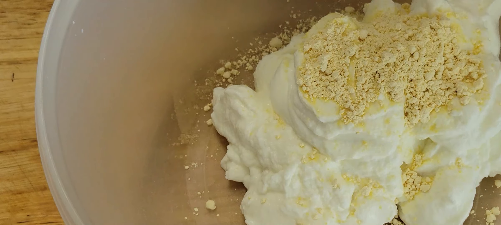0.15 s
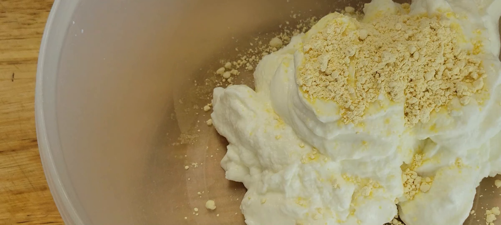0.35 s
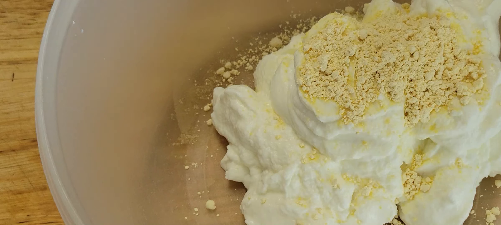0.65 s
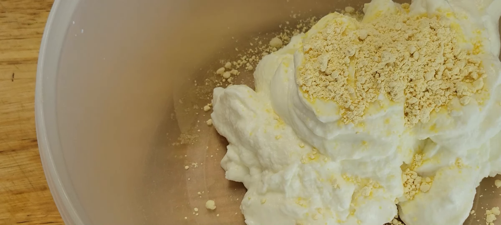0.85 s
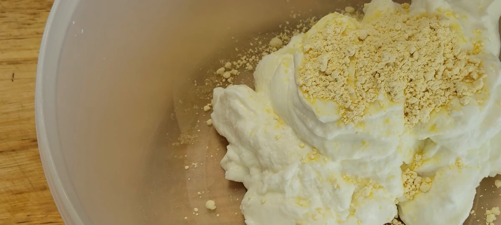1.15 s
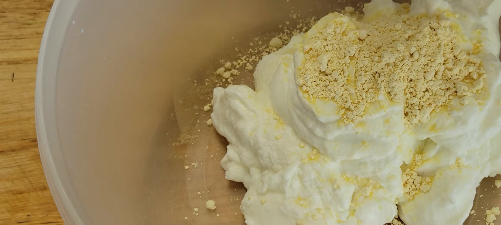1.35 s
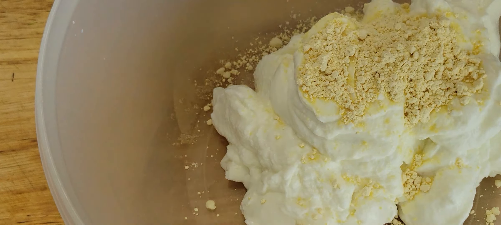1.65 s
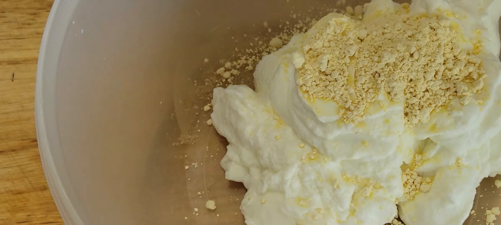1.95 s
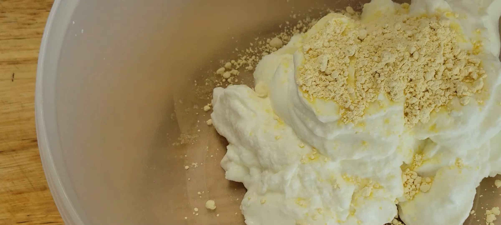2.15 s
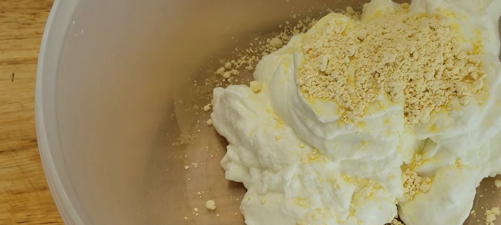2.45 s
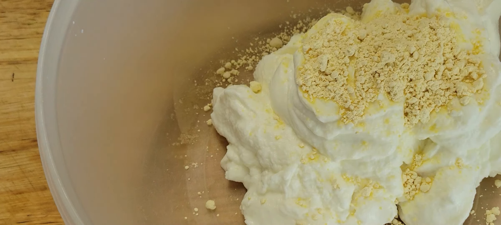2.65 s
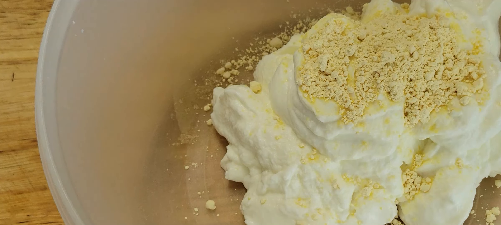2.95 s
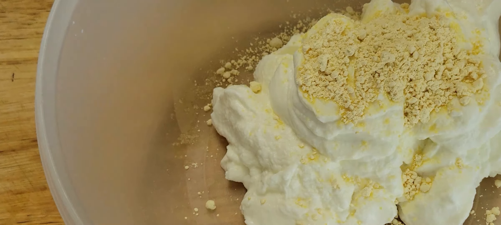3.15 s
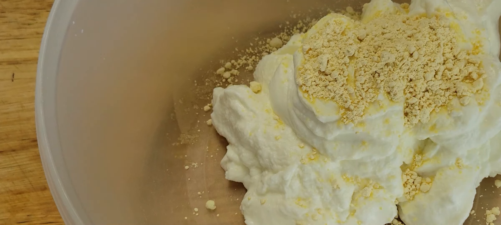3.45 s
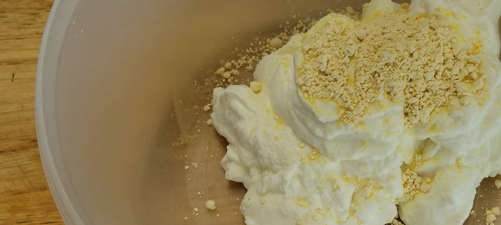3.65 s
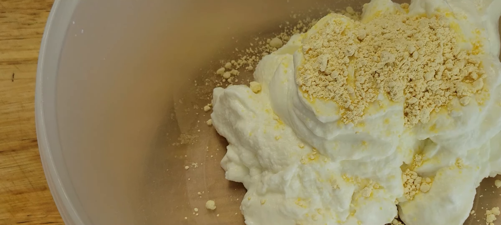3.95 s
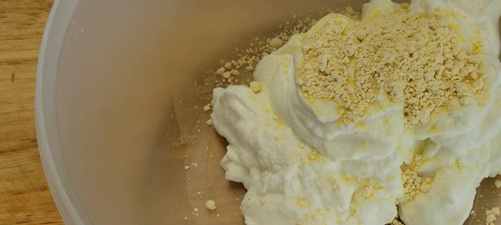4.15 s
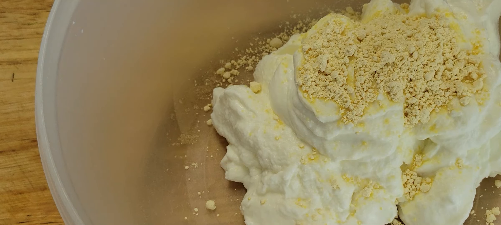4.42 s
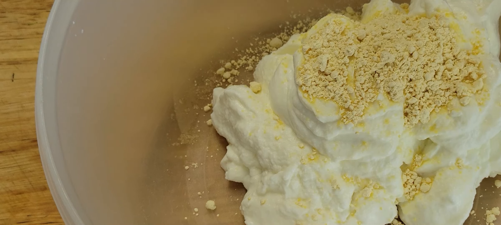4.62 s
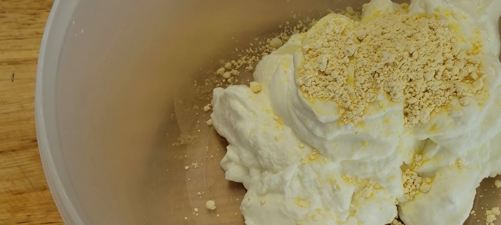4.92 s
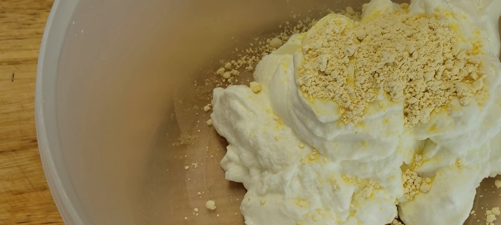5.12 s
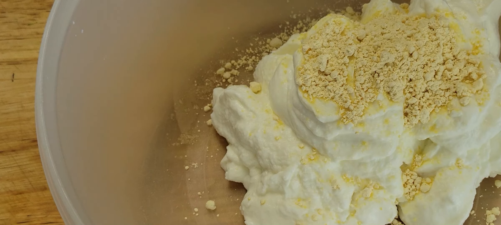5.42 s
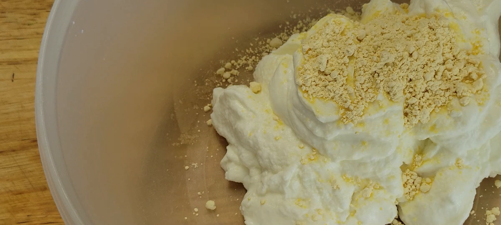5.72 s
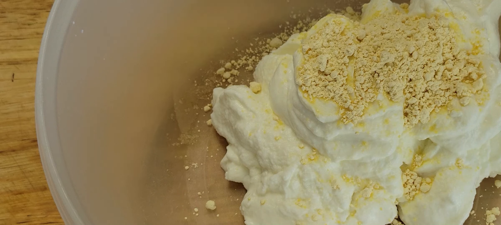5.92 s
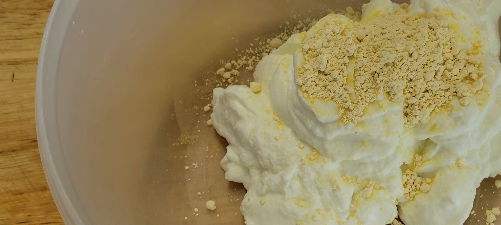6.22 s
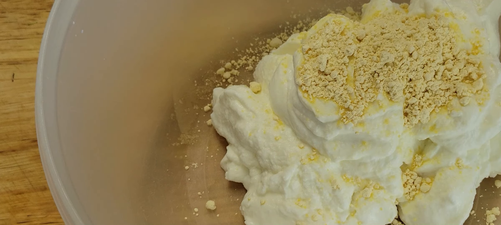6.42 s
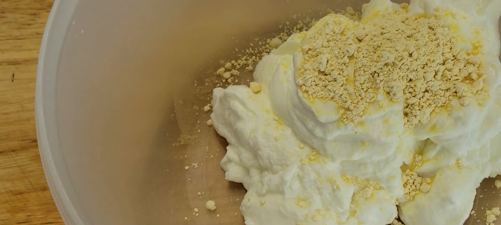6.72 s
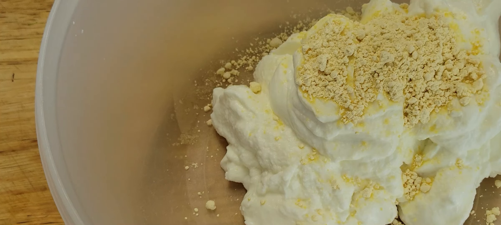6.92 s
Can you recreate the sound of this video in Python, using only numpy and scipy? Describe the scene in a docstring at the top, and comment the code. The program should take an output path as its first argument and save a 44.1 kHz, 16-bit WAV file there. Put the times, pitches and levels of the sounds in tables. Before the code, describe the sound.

In a quiet kitchen a steel tool clinks and rattles on a wooden counter, then a plastic bowl is knocked, dragged and thudded down.

```python
"""A quiet kitchen, small and hard-walled: coloured noise for air, sines for an appliance hum and a wavering drone.
Hands to the right make small ticks (short damped modes) and rustles (grainy noise).
A steel tool clinks and rattles on the counter: high modes, board modes and noise cracks.
A plastic bowl is knocked, dragged and set down: damped modes for the blows, grit through them for the slides.
Two spaced microphones hear it, with a decaying noise tail as the room."""
import sys
import numpy as np
from scipy import signal
from scipy.fft import rfft, irfft, next_fast_len
from scipy.io import wavfile
from scipy.ndimage import map_coordinates

SR = 44100
rng = np.random.default_rng(int(sys.argv[2]) if len(sys.argv) > 2 else 0)


def unload_audio(sound):
    """Save the sound as a 16-bit wav file, at the path given as the first command line argument."""
    columns = np.transpose(np.atleast_2d(sound))
    # keep every value between -1 and 1, then stretch to whole-number steps
    steps = np.round(np.clip(columns, -1, 1) * 32767)
    wavfile.write(sys.argv[1], SR, steps.astype(np.int16))


N = 312228  # samples in the scene

# Low drone, mean level over time: start_s [s], level_db [dB]
DRONE_LEVEL = [(0, -66), (.7, -67.5), (1.2, -73.5), (2, -66), (2.6, -61), (3, -59), (3.35, -62), (3.7, -56),
               (4.2, -53.5), (4.9, -56), (5.6, -74), (6.1, -62), (6.8, -56.5), (7.08, -63)]
DRONE_HZ = 95.5  # mean pitch
# Appliance hum tones, mean level: pitch_hz [Hz], level_db [dB]
HUM_TONES = [(118.4, -71.5), (240.5, -89), (359.7, -70.5), (420, -79), (467, -85), (719, -88)]
# Room tone colour, relative: pitch_hz [Hz], density_db [dB per Hz]
AIR_COLOUR = [(15, -42.5), (30, -18.5), (55, 1.5), (100, -4), (150, -8.5), (300, -15), (400, -4.5),
              (550, -12), (1200, -21.5), (2500, -29), (6000, -37.5), (16000, -47)]
AIR_DB = -69.5  # room tone level
# Left-right correlation of the room tone: pitch_hz [Hz], likeness [-1 to 1]
AIR_LIKENESS = [(60, 0.58), (130, 0.54), (290, 0.22), (640, -0.71), (1410, -0.38), (3100, -0.41),
                (6820, 0.18), (15000, -0.97)]
# Decay of the room: pitch_hz [Hz], t60_s [s]
ROOM_DECAY = [(100, 0.12), (600, 0.31), (3000, 0.26), (12000, 0.18)]

# Dry ticks: start_s [s], level_db [dB, relative], favoured pitch_hz [Hz]
TICKS = [(.017, -58.5, 1780), (1.959, -39.5, 2300), (1.974, -52, 4500), (1.983, -34, 1940),
         (1.9925, -28, 4030), (2.007, -47, 3050), (2.016, -63, 1790), (2.026, -47.5, 4000),
         (2.068, -54, 4000), (3.5, -53.5, 3500), (5.89, -48, 4640), (6.042, -55, 4500),
         (6.366, -42.5, 2800), (6.374, -39.5, 2820), (6.394, -38, 4500), (6.407, -37, 2780),
         (6.42, -43, 3500), (6.488, -40, 2900), (6.509, -41, 5600), (6.55, -39.5, 5600),
         (6.581, -33.5, 2090), (6.6, -57, 4460)]
# Modes of the small hard thing that ticks: pitch_hz [Hz], level_db [dB, relative], t60_s [s]
SMALL_MODES = [(1010, 0.5, 0.022), (1840, 9.5, 0.014), (2736, 10.5, 0.0081), (3560, 2.5, 0.0085),
               (4600, 6.5, 0.0085), (5700, 4, 0.005), (6500, 7.5, 0.01)]
# Brushes of hands and cloth, the fade spanning 30 dB on either side:
# start_s [s], hold_s [s], level_db [dB], fade_s [s], colour_hz [Hz]
BRUSHES = [(.02, .002, -60.5, 0.015, 2350), (0.337, 0.04, -80, .1, 1600), (0.443, .005, -72, .08, 1460),
           (0.76, .02, -85, .1, 2110), (0.89, 0.0046, -70.5, 0.16, 1550),
           (1.446, 0.024, -74.5, 0.032, 2500), (1.507, 0.015, -73, 0.099, 4600),
           (1.87, 0.04, -69, 0.049, 1270), (1.958, 0.0068, -57, 0.018, 2500),
           (1.983, 0.037, -67, 0.066, 3620), (2.403, .02, -94, 0.17, 1400),
           (2.697, 0.0091, -80, 0.11, 2900), (2.914, .005, -73.5, 0.13, 1600),
           (3.27, .02, -76.5, 0.085, 1600), (3.506, 0.0069, -59.5, 0.024, 3000),
           (3.53, 0.024, -78, 0.087, 3300), (3.693, 0.3, -79, 0.083, 1500), (4.12, 0.026, -81, .15, 2830),
           (5.9, .03, -77, 0.086, 4000), (6.099, 0.15, -72.5, .2, 6030)]

# Mode pitches of the steel tool: pitch_hz [Hz]
STEEL_HZ = [2474, 3149, 3219, 4175, 6094, 6224, 7448, 7720, 9637, 10515, 10992, 11170, 12340, 13332, 13432,
            15150]
# The same modes: t60_s [s], level_db struck at spots 1, 2 and 3 [dB], bounce_db [dB, relative]
STEEL_RING = [(0.25, -24.5, -39, -43.5, -35), (0.91, -53, -45, -37.5, -26.5), (0.58, -55, -44, -34, -26),
              (0.6, -38, -27.5, -27.5, -38), (1, -54.5, -43, -38, -55), (0.95, -32, -24, -18, -32.5),
              (0.91, -48, -37, -44, -42), (0.45, -43.5, -33.5, -22.5, -28), (0.35, -61.5, -52, -34, -51.5),
              (0.32, -62.5, -56, -46.5, -50), (0.11, -35.5, -21.5, -42, -35), (0.39, -49, -37, -51, -56),
              (0.37, -70, -47, -49, -56.5), (0.45, -60, -47.5, -43, -54.5),
              (0.38, -58, -48.5, -48.5, -54.5), (.1, -74, -77.5, -50.5, -71.5)]
# Ringing contacts of the tool: start_s [s], crack_db [dB]
CLINKS = [(4.3827, -27), (4.4189, -19), (4.5479, -20)]
# Landings of the tool on the counter: start_s [s], level_db [dB, reference for ring and tap]
LANDINGS = [(4.383, -14.5), (4.394, -16.5), (4.417, -16), (4.547, -7.5), (4.588, -20.5), (4.609, -16.5),
            (4.62, -21), (4.633, -18.5), (4.651, -18.5), (4.664, -15.5), (4.678, -16), (4.694, -17.5),
            (4.705, -17.5), (4.716, -21.5), (4.734, -28)]
# The tool trembling on the counter: start_s [s], hold_s [s], level_db [dB], release_s [s per 30 dB]
CHATTER = [(4.373, 0.073, -40, 0.27), (4.546, 0.15, -33, 0.21)]
# Modes of the counter board: pitch_hz [Hz], level_db [dB, relative], t60_s [s]
BOARD_MODES = [(157, -2.5, 0.091), (293, -1.5, 0.051), (483, -5, 0.045), (776.3, -3.5, 0.018),
               (888, 3, 0.04), (1016, 0.5, .05), (1153, -1, 0.088), (1384, -7, 0.038), (1643, 0.5, 0.15),
               (1772, 5.5, 0.095), (2120, -8.5, 0.025), (2880, -4, 0.055), (3556, -7.5, 0.046),
               (4500, -10.5, 0.041)]
# Stereo lean of the tool: pitch_hz [Hz], left minus right level_db [dB]
TOOL_LEAN = [(60, -1.5), (700, 4), (2000, 7), (4200, -8.5), (6200, -4.5), (9000, -8.5), (15000, -6)]
GRIP_S, GRIP_DB_PER_S = 4.801, 114.5  # a hand closes on the tool, and how fast the ring then falls
LANDING_HZ = 1400  # colour of a landing
BOARD_DB, FEED_DB, TAP_DB = -15.5, -2.5, -0.5  # board ring, steel ring and tap against the landing level

# Modes of the plastic bowl: pitch_hz [Hz], level_db [dB, relative], t60_s [s]
BOWL_MODES = [(268, 1, 0.082), (362, 2.5, 0.091), (393.6, 0.5, 0.092), (464, 0, .08), (512.5, -0.5, 0.11),
              (726, -4, 0.055), (985, -5, 0.04), (1224, 10, 0.016), (1405, 5, 0.018), (1731, 9.5, 0.014),
              (2278, 1, 0.021)]
RIM_ABOVE_HZ = 850  # bowl modes above this belong to the rim, the rest to the wall
# Low modes of the counter: pitch_hz [Hz], level_db [dB, relative], t60_s [s]
COUNTER_MODES = [(63, 1.5, 0.36), (96.6, 7, 0.12), (148.6, 5.5, 0.13), (173.7, 1, .1)]
# Bowl knocks, levels before the mode levels: start_s [s], click_db [dB], rim_db [dB],
# wall_db [dB], favoured wall_hz [Hz], counter_db [dB], favoured counter_hz [Hz]
KNOCKS = [(0.747, -71, -78, -53, 460, -71, 99.6), (2.4198, -81, -80, -58, 390, -64, 86.1),
          (2.4686, -80, -81.5, -53.5, 346, -70, 94.2), (2.7579, -85, -87, -58, 368, -75, 86.1),
          (3.694, -58, -54, -29.5, 538, -91, 91.5), (3.843, -32.5, -40.5, -25.5, 409, -49, 127),
          (5.1517, -34.5, -28, -30, 382, -55, 199), (5.1571, -32, -21, -26, 378, -60, 199),
          (5.1642, -20, -27.5, -30, 385, -48.5, 156), (5.1789, -41, -45, -27.5, 353, -59, 178),
          (5.2106, -35, -55, -23.5, 287, -34, 199), (5.235, -24, -27, -19, 384.4, -29.5, 143),
          (5.2589, -38, -31.5, -47, 355, -30.5, 164), (5.3819, -32.5, -42, -30, 230, -21, 199),
          (5.387, -20, -27.5, -28, 335, -48, 129), (5.4015, -31.5, -57, -20.5, 275, -37.5, 151),
          (5.4502, -40.5, -63, -35, 385, -38, 164), (5.4647, -42, -46, -52, 355, -45, 145),
          (5.5655, -43.5, -54, -46, 403, -49, 164), (5.6856, -33, -43, -33, 447, -64, 64.6),
          (5.6958, -51, -69, -34.5, 394, -50, 105), (5.7375, -35.5, -41.5, -34.5, 396, -51.5, 140),
          (5.7589, -48.5, -57, -36, 412, -56.5, 180), (6.2601, -51.5, -49.5, -25.5, 285, -21.5, 91.5),
          (6.2827, -47, -68, -44, 232, -20.5, 61.9), (6.3982, -31.5, -35, -42.5, 340, -42, 67.3),
          (6.4616, -43, -68, -55, 284, -27, 59.2), (6.5053, -40, -47, -34, 253, -28.5, 70.0),
          (6.5266, -37.5, -38, -14, 294, -12.5, 132), (6.5567, -44, -59, -34, 255, -19.5, 135),
          (6.5724, -32, -50, -52, 299, -26, 140)]
# Bowl slides: start_s [s], attack_s [s per 30 dB], hold_s [s],
# scratch_db [dB], fizz_db [dB], rub_db of the wall [dB], rumble_db of the counter [dB]
SLIDES = [(5.155, 0.025, 0.049, -50.5, -74.5, -48.5, -56.5), (5.234, 0.017, 0.0063, -41, -49.5, -35, -41.5),
          (5.382, 0.019, 0.025, -49.5, -58.5, -40.5, -40), (5.456, 0.018, 0.016, -48, -56.5, -49.5, -57.5),
          (5.553, 0.014, .005, -59, -81, -50, -74), (5.69, 0.025, 0.041, -56.5, -77, -57.5, -54),
          (5.736, .012, .005, -51, -69.5, -45, -65), (5.799, .1, 0.13, -73, -106, -70.5, -72),
          (6.037, .15, 0.021, -73, -82.5, -71.5, -66), (6.18, 0.32, 0.065, -81, -73.5, -79, -69),
          (6.256, .012, 0.059, -66, -96, -54.5, -47.5), (6.362, .015, 0.12, -52, -59, -59, -50.5),
          (6.524, 0.025, 0.031, -58, -65.5, -42.5, -33), (6.576, .012, 0.0025, -48.5, -52, -48.5, -39),
          (6.71, .1, 0.1, -71, -87, -76, -64), (6.855, .1, 0.036, -77, -100, -92, -64),
          (6.954, .2, .02, -77.5, -100, -88, -62), (7.05, 0.095, 0.033, -70.5, -111, -86, -68)]
# Release of scratch, fizz, rub and rumble: release_s [s per 30 dB]
SLIDE_RELEASE_S = (0.089, 0.039, 0.091, 0.17)
# Scratch colour, relative: pitch_hz [Hz], density_db [dB per Hz]
SCRATCH_COLOUR = [(500, -24), (1000, -3.5), (2000, -6), (3600, -14.5), (5500, -5), (8000, -22),
                  (16000, -38)]
# Stereo lean of bowl and hands: pitch_hz [Hz], left minus right level_db [dB]
BOWL_LEAN = [(60, -6.5), (300, -1.5), (700, -5.5), (1500, 7.5), (3000, 2.5), (6000, -7.5), (15000, -10.5)]
CLICK_HZ, SHEEN_DB = 3570, -23.5  # colour of the click; treble sheen against the click

TOP_HZ = 15900  # band limit


def amp(db):
    """Gain of a dB value."""
    return 10 ** (np.asarray(db) / 20)


def unit(x):
    """x at rms 1."""
    return x / np.sqrt(np.mean(x ** 2) + 1e-20)


def along(points, hz):
    """Read a (Hz, value) curve on a log frequency axis."""
    point_hz, value = np.transpose(points)
    return np.interp(np.log(hz + 1), np.log(point_hz + 1), value)


def wobble(rate):
    """A smooth random curve, rate knots a second."""
    knots = rng.standard_normal(int(N * rate / SR) + 4)
    return map_coordinates(knots, [np.arange(N) * rate / SR])


def filtered(x, response):
    """x times a complex response of frequency."""
    size = next_fast_len(x.shape[-1] + 8192)
    spectrum = rfft(x, size) * response(np.fft.rfftfreq(size, 1 / SR))
    return irfft(spectrum, size)[..., :x.shape[-1]]


def bump(centre_hz, octaves):
    """A bell-shaped colour around a centre."""
    return lambda hz: np.exp(-.5 * (np.log2((hz + 1) / centre_hz) / octaves) ** 2)


def add(track, s, sound):
    """Mix a sound in at s seconds."""
    part = track[round(s * SR):][:len(sound)]
    part += sound[:len(part)]


def near(modes, hz, db):
    """A blow favours the modes close to one pitch: db lost per octave away, up to one octave."""
    octaves_away = abs(np.log2(np.array(modes)[:, 0] / hz))
    return -db * np.minimum(octaves_away, 1)


def ring(modes, gains_db, length, attack, detune=0., waver_db=0.):
    """Damped modes after one blow; grip and load shift the pitches, motion makes the levels waver."""
    t = np.arange(int(length * SR)) / SR
    hz, db, t60 = np.transpose(modes)[:, :, None]
    shift, beat, phase = rng.standard_normal((3, len(hz), 1))
    waver = waver_db * np.sin(2 * np.pi * (9 * beat * t + phase))
    level_db = db + gains_db[:, None] - 60 * t / t60 + waver
    tones = amp(level_db) * np.sin(2 * np.pi * hz * (1 + detune * shift) * t)
    return tones.sum(axis=0) * (1 - np.exp(-t / attack))


def crack(t60, colour, attack=0.0006):
    """A short coloured noise burst with an exponential decay."""
    t = np.arange(SR // 8) / SR
    noise = unit(filtered(rng.standard_normal(len(t)), colour))
    return noise * amp(-60 * t / t60) * (1 - np.exp(-t / attack))


def grit(rough_db):
    """Friction noise broken into millisecond grains of uneven size."""
    grain_db = rough_db * wobble(460) + 0.5 * rough_db * wobble(60)
    return unit(rng.standard_normal(N) * amp(grain_db))


def resonate(x, modes, damping):
    """Steady excitation through the modes of a body, widened by damping."""
    def body(f):
        total = 0
        for k, (hz, db, t60) in enumerate(modes):
            width_hz = 2.2 * damping / t60
            band = 1j * f * width_hz / (hz * hz - f * f + 1j * f * width_hz)
            total = total + (-1) ** k * amp(db) * band  # neighbours in opposite polarity
        return total
    return unit(filtered(x, body))


def swells(start, hold, db, attack, release):
    """Gain of events that rise, hold and fall; attack and release are the times for 30 dB."""
    t = np.arange(N) / SR
    power = np.zeros(N)
    for s, h, level_db, a, r in np.broadcast(start, hold, db, attack, release):
        away = np.maximum((s - t) / a, 0) + np.maximum((t - s - h) / r, 0)
        power += amp(level_db - 30 * away) ** 2
    return np.sqrt(power)


def room_tone():
    """Coloured noise as mid and side, balanced so left and right correlate as the table asks."""
    turn = lambda hz: np.arccos(np.clip(along(AIR_LIKENESS, hz), -1, 1)) / 2
    colour = lambda hz: amp(along(AIR_COLOUR, hz)) * [np.cos(turn(hz)), np.sin(turn(hz))]
    mid, side = filtered(rng.standard_normal((2, N)), colour)
    return amp(AIR_DB) * unit(np.array([mid + side, mid - side]))


def appliance_hum():
    """Steady tones with restless level and phase, half a radian apart between the channels."""
    t = np.arange(N) / SR
    hum = np.zeros((2, N))
    for hz, db in HUM_TONES:
        phase = .4 * wobble(14) + [[0], [.5]]
        hum += amp(db + 1.9 * wobble(7.2)) * np.sin(2 * np.pi * hz * t + phase)
    return hum


def low_drone():
    """One sine that swells and sinks while its pitch wanders slowly."""
    s, db = np.transpose(DRONE_LEVEL)
    level_db = np.interp(np.arange(N) / SR, s, db) + wobble(5.1)
    pitch_hz = DRONE_HZ + 0.73 * wobble(0.64)
    return amp(level_db) * np.sin(2 * np.pi * np.cumsum(pitch_hz) / SR)


def room(x):
    """Noise tail at both microphones; each frequency of the room's answer dies at its own speed."""
    hz, t, z = signal.stft(rng.standard_normal((2, SR // 2)), SR, nperseg=256)
    decay = amp(-60 * t / along(ROOM_DECAY, hz)[:, None])
    tail = signal.istft(z * decay, SR, nperseg=256)[1]
    tail = tail / np.linalg.norm(tail[0])
    late = np.pad(x, (150, 0))[None]  # samples before the room answers
    return signal.fftconvolve(late, tail, axes=1)[:, :N]


def placed(x, lean, lag_s):
    """A source on the right: later at the left microphone, with a level lean for each frequency."""
    half = np.array([[.5], [-.5]])  # left, right
    return filtered(x, lambda hz: amp(half * along(lean, hz)) * np.exp(-2j * np.pi * hz * lag_s * half))


def ticks():
    """Dry contacts of a small hard thing: quickly damped modes with a faint noise crack."""
    out = np.zeros(N)
    for s, db, hz in TICKS:
        strength_db = near(SMALL_MODES, hz, 22.5) + rng.normal(0, 5.1, len(SMALL_MODES))
        add(out, s, amp(db) * ring(SMALL_MODES, strength_db, .05, 0.00061, detune=0.04))
        add(out, s, amp(db - 23) * crack(0.0051, bump(3300, 1.0)))
    return out


def brushes():
    """Faint rubbing of hands and cloth: a dull and a bright rustle share the power by colour."""
    s, hold, db, fade, hz = np.transpose(BRUSHES)
    bright = np.clip(np.log2(hz / 1500) / 2, .001, .999)  # share of the power
    dull_colour = lambda f: 1.7 * bump(1270, .1)(f) + 1.8 * bump(2200, .15)(f) + 1.4 * bump(1600, .5)(f)
    bright_colour = lambda f: bump(5300, .15)(f) + 1.1 * bump(4500, .5)(f)
    dull_noise = unit(filtered(grit(1.1), dull_colour))
    bright_noise = unit(filtered(grit(3.2), bright_colour))
    dull_gain = swells(s, hold, db + 10 * np.log10(1 - bright), fade, fade)
    bright_gain = swells(s, hold, db + 10 * np.log10(bright), fade, fade)
    return dull_gain * dull_noise + bright_gain * bright_noise


def steel_ring():
    """Each clink stops the old ring and starts a new one; late bounces feed it, then a hand damps it."""
    t = np.arange(N) / SR
    bar, snap = np.zeros((2, N))
    t60, *spots, bounce_db = np.transpose(STEEL_RING)
    modes = lambda db: np.transpose([STEEL_HZ, db, t60])
    for (s, crack_db), spot_db in zip(CLINKS, spots):
        bar = bar * amp(-60 * np.maximum(t - s, 0) / 0.042)
        add(bar, s, ring(modes(spot_db), rng.normal(0, 0.9, len(t60)), 1.0, .001, waver_db=3.0))
        add(snap, s, amp(crack_db) * crack(0.032, bump(5400, 0.44)))
    for s, db in LANDINGS:
        if s > CLINKS[-1][0]:  # only the free bounces after the last clink
            add(bar, s, amp(db + FEED_DB) * ring(modes(bounce_db), rng.normal(0, 1.3, len(t60)), 1.0, .001))
    return bar * amp(-GRIP_DB_PER_S * np.maximum(t - GRIP_S, 0)), snap


def tool_on_board():
    """Every landing rings the board and taps it; trembling drives the same modes with grit."""
    top = np.zeros(N)
    for s, db in LANDINGS:
        strength_db = near(BOARD_MODES, LANDING_HZ, 4.6) + rng.normal(0, 2.8, len(BOARD_MODES))
        add(top, s, amp(db + BOARD_DB) * ring(BOARD_MODES, strength_db, .2, 0.00046, detune=.03))
        add(top, s, amp(db + TAP_DB) * crack(0.022, bump(LANDING_HZ, 1.0)))
    s, hold, db, release = np.transpose(CHATTER)
    top += swells(s, hold, db, 0.0067, release) * resonate(grit(4.4), BOARD_MODES, 2.1)
    return filtered(top, lambda hz: 1 / (1 + 1j * hz / 7000) ** 4)  # wood passes little treble


def bowl_knocks():
    """A blow clicks and rings the bowl's wall and rim, and thuds the counter near a favoured pitch."""
    shell, thud = np.zeros((2, N))
    is_rim = np.array(BOWL_MODES)[:, 0] > RIM_ABOVE_HZ
    for s, click_db, rim_db, wall_db, wall_hz, counter_db, counter_hz in KNOCKS:
        add(shell, s, amp(click_db) * crack(0.017, bump(CLICK_HZ, 0.59)))
        add(shell, s, amp(click_db + SHEEN_DB) * crack(0.021, bump(5500, 1.0)))
        strength_db = np.where(is_rim, rim_db, wall_db + near(BOWL_MODES, wall_hz, 42))
        strength_db = strength_db + rng.normal(0, 2.86, len(BOWL_MODES))
        add(shell, s, ring(BOWL_MODES, strength_db, .3, 0.0019, detune=0.035))
        counter_ring = ring(COUNTER_MODES, near(COUNTER_MODES, counter_hz, 27), 0.77, 0.0018)
        add(thud, s, amp(counter_db) * counter_ring)
    return shell, thud


def bowl_slides():
    """Dragging makes scratch and fizz, and rubs the wall and counter modes with grainy friction."""
    s, attack, hold, *layers_db = np.transpose(SLIDES)
    scratch, fizz, rub, rumble = [swells(s, hold, db, attack, release)
                                  for db, release in zip(layers_db, SLIDE_RELEASE_S)]
    grains = grit(3.1)
    shell = scratch * unit(filtered(grains, lambda hz: amp(along(SCRATCH_COLOUR, hz))))
    shell += fizz * unit(filtered(grains, bump(6000, 1.0)))
    shell += rub * resonate(grit(6.1), BOWL_MODES[:6], 2.5)  # wall modes only
    return shell, rumble * resonate(grit(3.9), COUNTER_MODES, 2.3)


def scene():
    """All sources, direct and through the room."""
    background = room_tone() + appliance_hum() + low_drone()
    hands = ticks() + brushes()
    bar, snap = steel_ring()
    top = tool_on_board()
    knock_shell, knock_thud = bowl_knocks()
    slide_shell, slide_thud = bowl_slides()
    shell = knock_shell + slide_shell
    thud = knock_thud + slide_thud
    direct = placed(bar + snap + top, TOOL_LEAN, .0003)
    direct += placed(shell + hands, BOWL_LEAN, .00025)
    direct += thud  # equal in both channels
    wet = amp(-8) * bar + amp(-7) * top + amp(-5) * shell + amp(-13.5) * thud + amp(-14) * (hands + snap)
    return direct + room(wet) + background


def record(dry):
    """The microphones lose the deepest bass; nothing passes above the band limit."""
    low_cut = lambda hz: (1j * hz / (40 + 1j * hz)) ** 2
    return filtered(dry, lambda hz: low_cut(hz) * (hz < TOP_HZ))


dry = scene()
out = record(dry)
unload_audio(out)
```